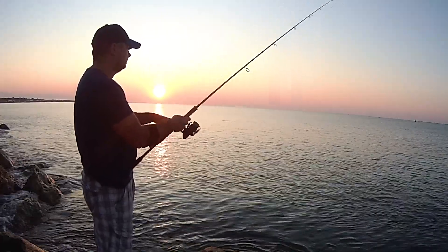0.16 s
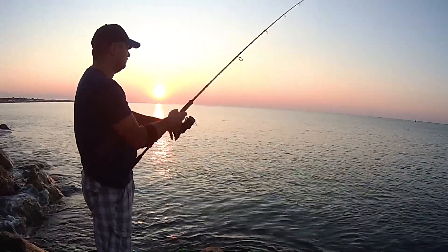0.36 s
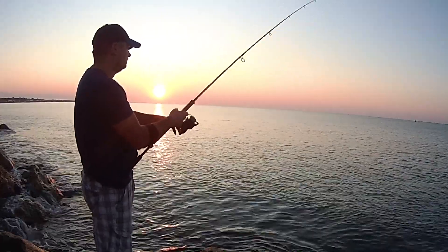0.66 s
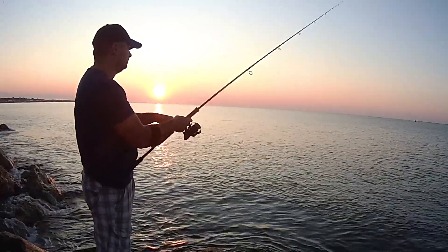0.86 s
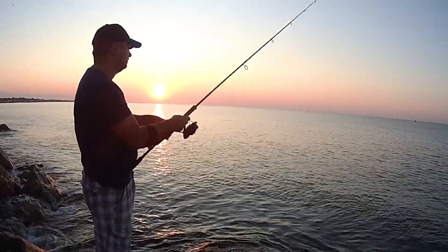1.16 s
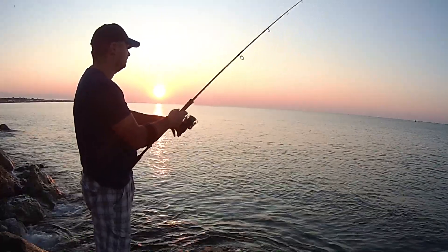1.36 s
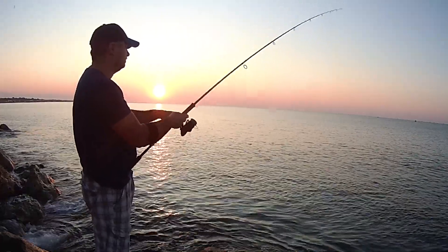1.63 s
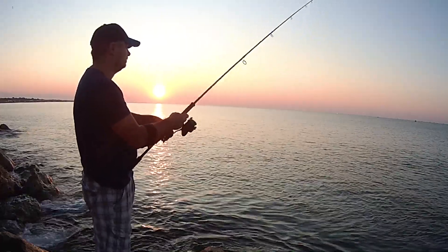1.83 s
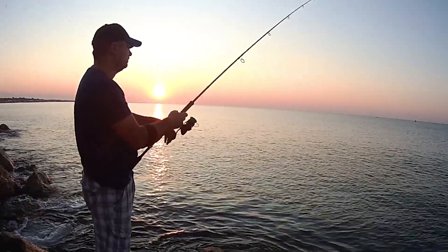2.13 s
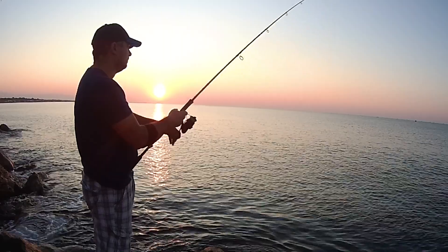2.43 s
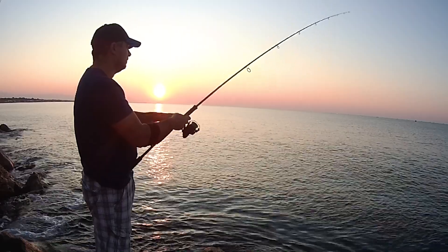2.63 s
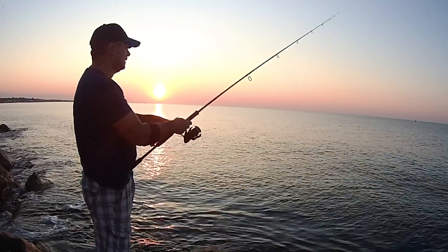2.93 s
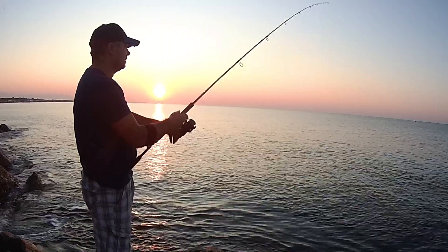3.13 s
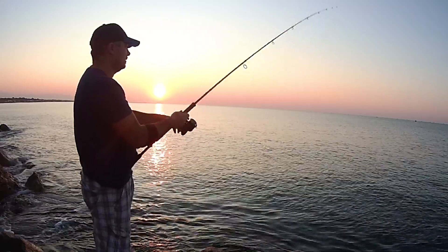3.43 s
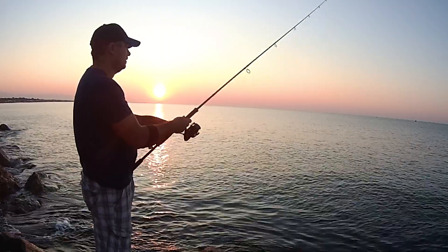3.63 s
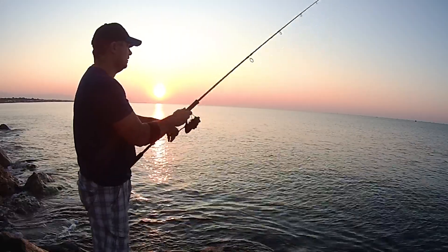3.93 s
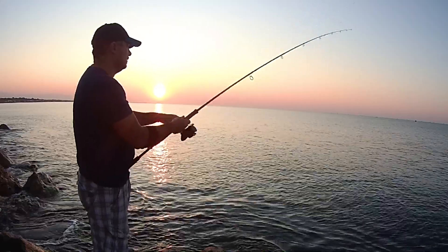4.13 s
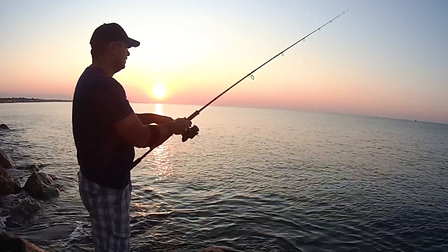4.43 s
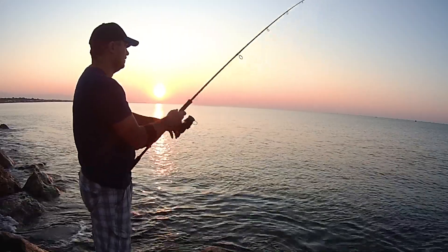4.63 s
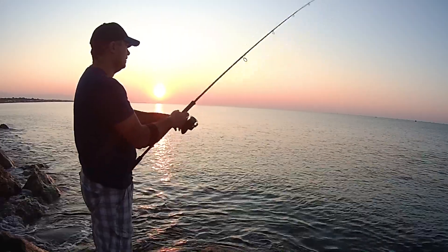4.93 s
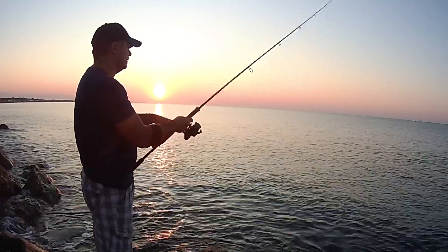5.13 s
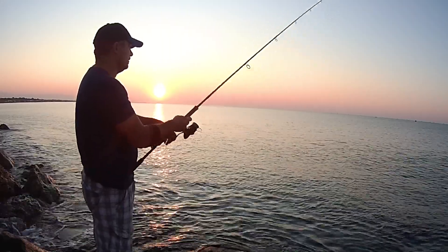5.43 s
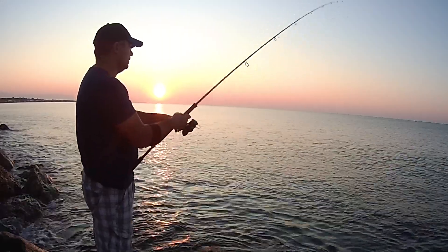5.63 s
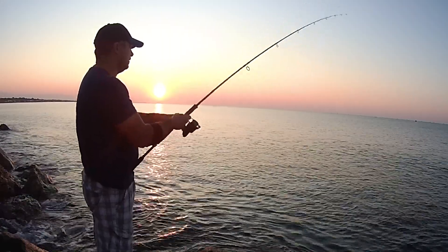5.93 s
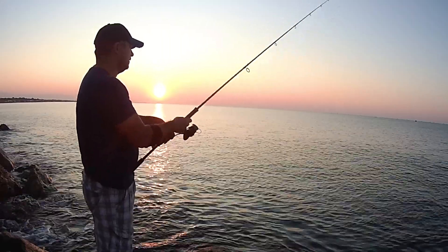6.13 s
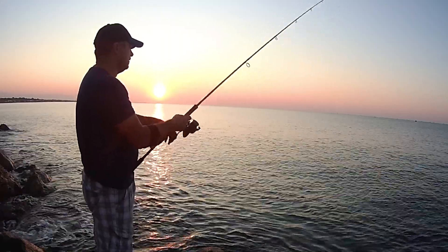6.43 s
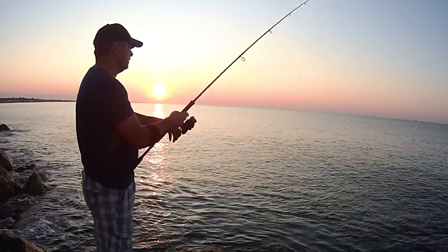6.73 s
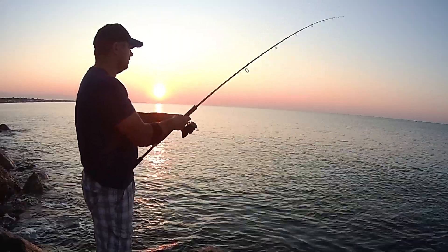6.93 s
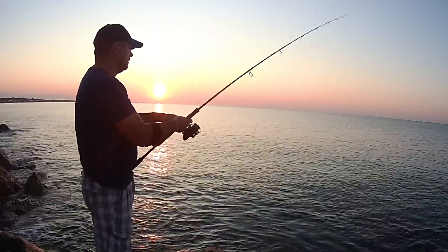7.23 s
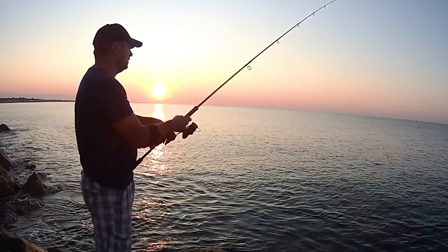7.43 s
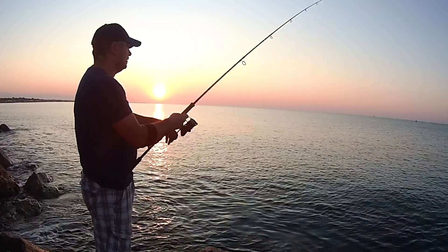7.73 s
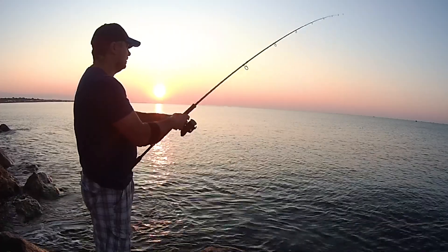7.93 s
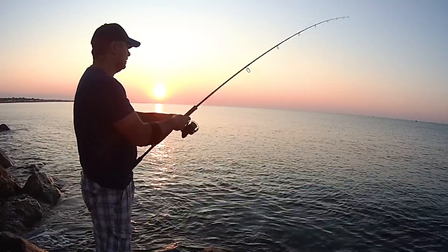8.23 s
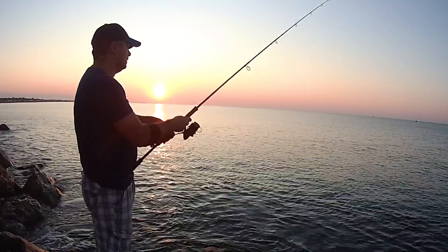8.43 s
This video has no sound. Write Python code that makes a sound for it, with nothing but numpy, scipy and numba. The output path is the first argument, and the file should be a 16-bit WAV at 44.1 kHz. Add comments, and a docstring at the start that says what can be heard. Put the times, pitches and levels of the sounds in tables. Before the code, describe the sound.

On a rocky shore, gentle waves swell and ebb in a continuous, slightly hollow wash of bubbles. Clusters of small splashes and plops come after the first swell, ease off in the middle, then return more lightly. Underneath, soft gusts of wind make a low rumble on the microphone, while an occasional thin tick from a fishing reel barely shows through the water.

```python
"""Angler on shoreline rocks

Calm sea washes in and out of the rocks: four low waves build and drain, churning up clouds of short
bubbles. Wavelets slap the stones and air pockets plop between them. A light breeze rumbles on the
microphone in gusts, and the angler's reel and line tick faintly."""
import sys
import numpy as np
from scipy import signal
from scipy.fft import rfft, irfft, next_fast_len
from scipy.io import wavfile
from scipy.ndimage import uniform_filter1d
from numba import njit

SR = 44100
rng = np.random.default_rng(int(sys.argv[2]) if len(sys.argv) > 2 else 0)


def materialize(psi):
    """Save the field psi as 16-bit PCM at rate SR to the path in sys.argv[1].

    A 1-D psi becomes a single channel; in a 2-D psi each row is a channel.
    """
    bounded = np.clip(np.atleast_2d(psi).T, -1, 1)
    quanta = np.round(bounded * 32767).astype(np.int16)
    wavfile.write(sys.argv[1], SR, quanta)


N = 377919
TIME = np.arange(N) / SR


def undb(db):
    """Decibels to gain."""
    return 10 ** (np.asarray(db) / 20)


def unit(x):
    """Scale to rms 1."""
    return x / np.sqrt(np.mean(x ** 2))


def colour(x, points):
    """Minimum-phase filter through (f/Hz, level/dB) points; output at rms 1."""
    size = next_fast_len(N + 8192, True)
    hz, db = np.transpose(points)
    bin_hz = np.fft.rfftfreq(size, 1 / SR)
    gain_db = np.interp(np.log(bin_hz + 1), np.log(hz), db)
    cepstrum = irfft(np.log(undb(gain_db)), size)
    cepstrum[1:size // 2] *= 2
    cepstrum[size // 2:] = 0
    response = np.exp(rfft(cepstrum))
    return unit(irfft(rfft(x, size) * response, size)[:N])


def band(x, lo_hz, hi_hz, order=3):
    """Band-pass; output at rms 1."""
    sos = signal.butter(order, [lo_hz, hi_hz], "band", fs=SR, output="sos")
    return unit(signal.sosfilt(sos, x))


def walk(rate_hz):
    """Smooth random wander at rms 1."""
    knots = rng.standard_normal(4096)
    return unit(np.interp(TIME * rate_hz, np.arange(len(knots)), knots))


def burst(start_s, rise_s, decay_s):
    """Envelope: linear rise, exponential decay."""
    age_s = np.maximum(TIME - start_s, 0)
    return np.minimum(age_s / rise_s, 1) * np.exp(-np.clip((age_s - rise_s) / decay_s, 0, 20))


@njit
def ring(start_s, hz, amplitude, decay_s, glide):
    """Each bubble is a dying sine; its pitch climbs by the fraction `glide` as it nears the surface."""
    out = np.zeros(N)
    for k in range(len(start_s)):
        first, length = int(start_s[k] * SR), int(5 * decay_s[k] * SR) + 2
        step_rad = 2 * np.pi * hz[k] / SR
        phasor = amplitude[k] + 0j
        pole = np.exp(1j * step_rad - 1 / (decay_s[k] * SR))
        bend = np.exp(1j * step_rad * glide / length)
        for i in range(max(first, 0), min(first + length, N)):
            out[i] += phasor.imag
            phasor *= pole
            pole *= bend
    return out


def bubbles(count, lo_hz, hi_hz, cycles, spread_db, glide):
    """Cloud of bubbles of random strength, even over time and pitch; small ones die sooner."""
    when, pitch, strength, damping = rng.random((count, 4)).T
    hz = lo_hz + (hi_hz - lo_hz) * pitch
    amplitude = np.sqrt(hz) * undb(-spread_db * np.log(strength + 0.013))
    decay_s = cycles * (.5 + damping) / hz
    return unit(ring(when * N / SR, hz, amplitude, decay_s, glide))


# Breeze spectrum: f/Hz, level/dB
WIND_SPECTRUM = [(8, 1.5), (22, 2.5), (38, 3.5), (60, -4.5), (90, -10), (130, -20.5), (250, -29.5),
                 (800, -66)]
# Gusts: t/s, level/dB, half-width/s
WIND_GUSTS = [(.12, -42, 0.17), (0.698, -34.5, 0.018), (1.459, -43.5, 0.27), (2.443, -37.5, 0.37),
              (3.315, -35, 0.11), (4.09, -37, 0.14), (4.783, -42, 0.3), (5.67, -37.5, 0.045),
              (5.891, -27.5, 0.017), (5.95, -38, 0.19), (6.596, -44, 0.4), (8.406, -40.5, 0.18)]


def breeze(lull_db=-47.5):
    """Gusts rumble on the microphone; the stronger the wind, the more its eddies thump."""
    gust_power = sum(undb(db) ** 2 * np.exp(-((TIME - t_s) / width_s) ** 2)
                     for t_s, db, width_s in WIND_GUSTS)
    wind_db = 10 * np.log10(undb(lull_db) ** 2 + gust_power) + 0.88 * walk(12)
    rumble = colour(rng.standard_normal(N), WIND_SPECTRUM) * undb(wind_db)
    buffet_db = -41 + 2.1 * (wind_db + 34.5)
    buffet = band(rng.standard_normal(N), 23.6, 91, order=2) * undb(buffet_db)
    return rumble + buffet


# Tackle ticks: t/s, f/Hz, level/dB, decay/s
TACKLE_TICKS = [(3.173, 9200, -52, .0036), (3.58, 6340, -47, .011), (5.562, 13500, -53, .001),
                (5.9206, 14300, -43, .0004), (7.619, 13500, -52, .002)]


def tackle(rise_s=.0004):
    """Thin, bright ticks from the reel and line."""
    noise = rng.standard_normal(N)
    return sum(band(noise, hz / 1.09, hz * 1.04, order=2) * undb(db) * burst(t_s, rise_s, decay_s)
               for t_s, hz, db, decay_s in TACKLE_TICKS)


# Foam spectrum: f/Hz, level/dB
FOAM_SPECTRUM = [(4000, -30), (8100, -12), (9100, 4), (10500, -14), (12100, 2.5), (13300, -5), (15000, 1.5)]


def foam(froth_db):
    """The finest bubbles burst in a thin sizzle that follows the froth."""
    grains = bubbles(count=40000, lo_hz=6000, hi_hz=15600, cycles=2.7, spread_db=5.0, glide=0.039)
    return colour(grains, FOAM_SPECTRUM) * undb(froth_db - 34.5 + 1.1 * walk(25))


def rock_echo(x, t60_s=0.16, wet_db=-12):
    """Nearby boulders add a brief scattered echo."""
    age_s = TIME[:SR // 4]
    echo = rng.standard_normal(len(age_s)) * np.exp(-np.log(1000) * age_s / t60_s) * (age_s > .004)
    return x + undb(wet_db) * signal.fftconvolve(x, echo / np.linalg.norm(echo))[:N]


# Trapped air: t/s, f/Hz, level/dB, decay/cycles
AIR_POCKETS = [(.546, 960, -27.5, 21), (.628, 977, -25, 4), (2.236, 912, -19, 6.9), (2.336, 230, -28, 2.6),
               (2.347, 820, -19, 5), (2.838, 820, -17, 7.7), (2.871, 428, -27, 3), (3.101, 243, -24, 1.6),
               (3.1015, 1120, -15, 1.8), (4.386, 398, -34.5, 4.2), (4.638, 1500, -32.5, 6.2),
               (5.069, 394, -36.5, 12), (5.3007, 830, -16, 1.4), (5.528, 880, -23.5, 11),
               (5.617, 2050, -35, 8.9), (5.955, 2700, -26, 2.2), (6.513, 1280, -26, 9.1),
               (6.547, 2650, -33, 16), (7.768, 406, -24.5, 6.2), (7.7696, 570, -17, 1.9),
               (7.7838, 960, -25, 3.3)]


def plops():
    """Large air pockets ring between the stones; little of their sound lies below 200 Hz."""
    t_s, hz, db, cycles = np.transpose(AIR_POCKETS).copy()
    rings = ring(t_s, hz, undb(db), cycles / hz, glide=0.078)
    return signal.sosfilt(signal.butter(2, 200, "high", fs=SR, output="sos"), rings)


# Slaps and wash as heard, with a hollow 900 Hz resonance, probably the camera housing: f/Hz, level/dB
HOLLOW_SPECTRUM = [(60, -32.5), (170, -18.5), (300, -13.5), (430, -7), (680, -6.5), (800, -5), (900, -1.5),
                   (1200, -12), (1900, -13.5), (2650, -14.5), (3900, -23.5), (6300, -32.5), (8200, -42),
                   (15000, -42)]
# Flying droplet spectrum: f/Hz, level/dB
SPATTER_SPECTRUM = [(700, 9.5), (1650, 8.5), (2700, -7.5), (3700, -5), (4600, -7.5), (5500, -15.5),
                    (8500, -25.5), (15000, -33)]
# Wavelets on stone: t/s, level/dB, decay/s, spatter re knock/dB
WAVELETS = [(0.629, -33, .004, -1), (2.232, -27, 0.0097, -23), (2.332, -28, 0.045, -6),
            (2.39, -37, .04, 2.5), (2.441, -28, 0.014, -22), (2.76, -29.5, 0.023, -6.5),
            (2.797, -29.5, .04, -3.5), (2.868, -35, 0.075, -1.5), (3.065, -35.5, 0.031, -1),
            (3.102, -41.5, 0.032, 4.5), (3.199, -32, 0.032, -2.5), (3.268, -27, 0.035, -11),
            (3.49, -42, .04, -5), (3.66, -32, 0.076, -10.5), (5.3005, -32.5, .01, -3),
            (5.345, -31, 0.011, -28), (5.666, -29, 0.0045, -8.5), (5.774, -33, 0.033, -8),
            (6.545, -40, 0.017, 5.5), (6.589, -37.5, 0.058, -5), (7.021, -36.5, .012, 6),
            (7.103, -33.5, 0.028, -8), (7.147, -36, 0.041, -5.5), (7.220, -28.5, 0.0046, -20),
            (7.483, -31, 0.037, -16), (7.554, -29, .007, -25)]


def slaps(rise_ratio=0.19):
    """Wavelets hit stone: a hollow knock and a spatter of droplets; longer slaps start more softly."""
    knock = band(colour(rng.standard_normal(N), HOLLOW_SPECTRUM), 498, 1240)
    drops = bubbles(count=16000, lo_hz=1014, hi_hz=14380, cycles=4.4, spread_db=-0.7, glide=0.027)
    spatter = colour(drops, SPATTER_SPECTRUM)
    return sum(burst(t_s, rise_ratio * decay_s, decay_s) * undb(db) * (knock + undb(rel_db) * spatter)
               for t_s, db, decay_s, rel_db in WAVELETS)


# Waves among the rocks: crest t/s, level/dB, build/s, drain/s, froth re water/dB
SHORE_WAVES = [(1.83, -31, 1.56, 0.67, -0.9), (3.45, -34, 2.6, 0.73, -3), (5.68, -37.5, 0.31, 0.64, -2),
               (7.92, -34.5, 0.92, 1.8, -1)]


def surge(ebb_db=-43.5, froth_lag_s=0.041, crest_shape=1.16):
    """Water and froth levels in dB: each wave builds and drains to the ebb; its froth lags behind."""
    def power(from_crest_s, db, build_s, drain_s):
        away = np.abs(from_crest_s) / np.where(from_crest_s < 0, build_s, drain_s)
        return (undb(db) * np.exp(-away ** crest_shape)) ** 2  # shape 1: pointed, 2: round
    water = froth = undb(ebb_db) ** 2
    for crest_s, db, build_s, drain_s, rel_db in SHORE_WAVES:
        water = water + power(TIME - crest_s, db, build_s, drain_s)
        froth = froth + power(TIME - froth_lag_s - crest_s, db + rel_db, build_s, drain_s)
    return 10 * np.log10(water), 10 * np.log10(froth)


def wash(surge_db, froth_db, ref_db=-35.5, growth=1.14):
    """Bubbles crackle and ring over a rush; gurgle and churn follow the surge, spray the froth."""
    swell_db = surge_db - ref_db
    crackle = bubbles(count=70000, lo_hz=155, hi_hz=14570, cycles=0.82, spread_db=4.0, glide=0.04)
    fizz = bubbles(count=26000, lo_hz=224.7, hi_hz=8040, cycles=9.1, spread_db=3.5, glide=0.062)
    # a full surge merges into a rush; at the ebb single bubbles stand out
    rush = rng.standard_normal(N) * undb(1 + 0.63 * swell_db)
    blend = rush + undb(-2.5) * crackle + undb(-3.5) * fizz
    levelled = blend / np.sqrt(uniform_filter1d(blend ** 2, size=SR // 4))
    water = colour(levelled, HOLLOW_SPECTRUM)
    gurgle = band(water, 120, 555) * undb(-10.5 + growth * swell_db + 2.4 * walk(22))
    churn = band(water, 628, 1284) * undb(swell_db)
    spray = band(water, 1450, 13500) * undb(-9 + growth * (froth_db - ref_db) + 0.88 * walk(40))
    return (gurgle + churn + spray) * undb(ref_db + 1.69 + 0.7 * walk(18))


def scene():
    """Water among the rocks, tackle, breeze and a faint steady hiss, in mono."""
    surge_db, froth_db = surge()
    water = wash(surge_db, froth_db) + foam(froth_db) + rock_echo(slaps() + plops())
    hiss = undb(-72.0) * rng.standard_normal(N)
    return (water + tackle() + breeze() + hiss)[None]


def record(dry):
    """The camera cuts the top treble steeply."""
    cutoff_hz = 15700
    return signal.sosfilt(signal.ellip(10, .2, 70, cutoff_hz, fs=SR, output="sos"), dry)


dry = scene()
out = record(dry)
materialize(out)
```